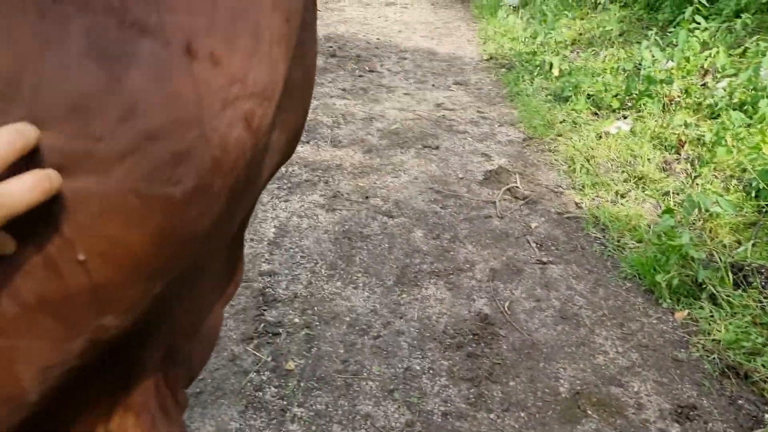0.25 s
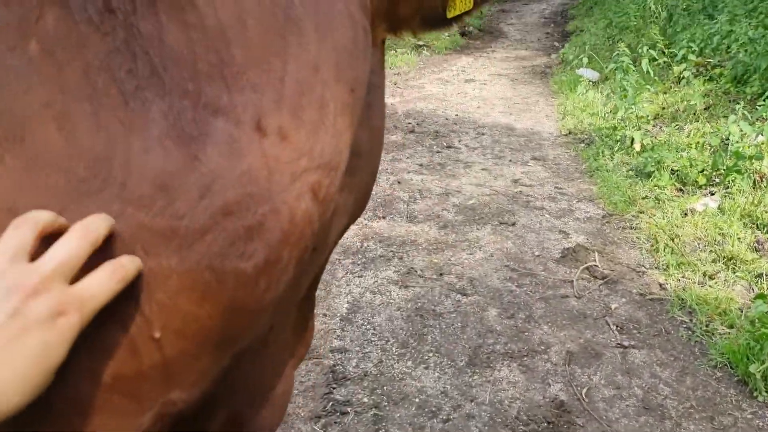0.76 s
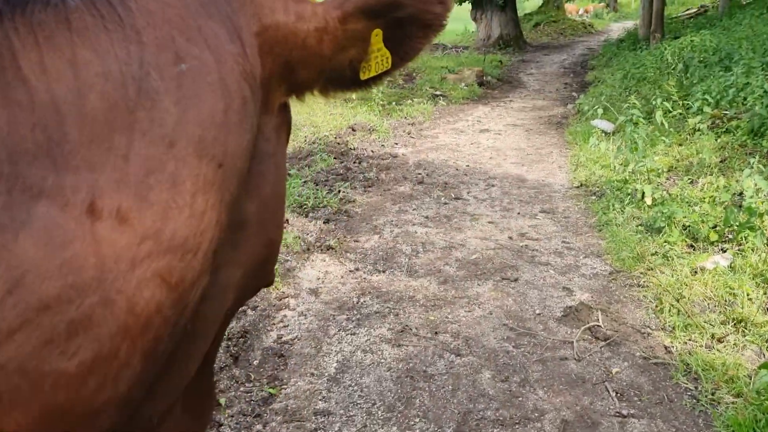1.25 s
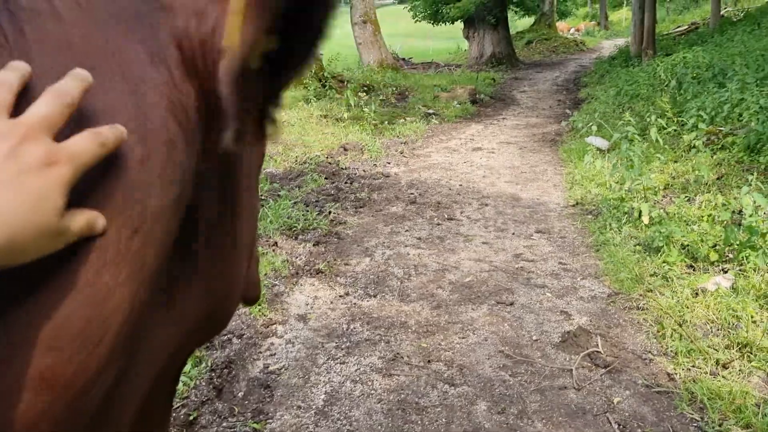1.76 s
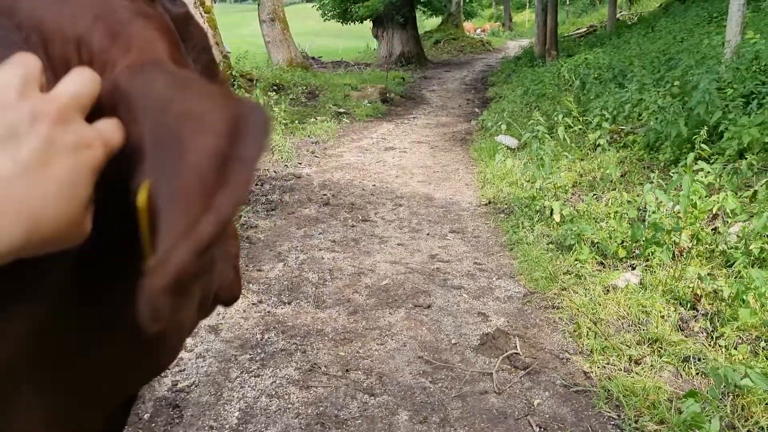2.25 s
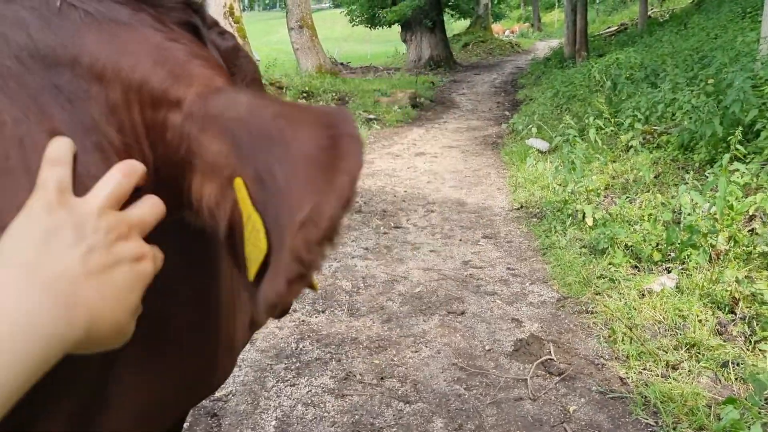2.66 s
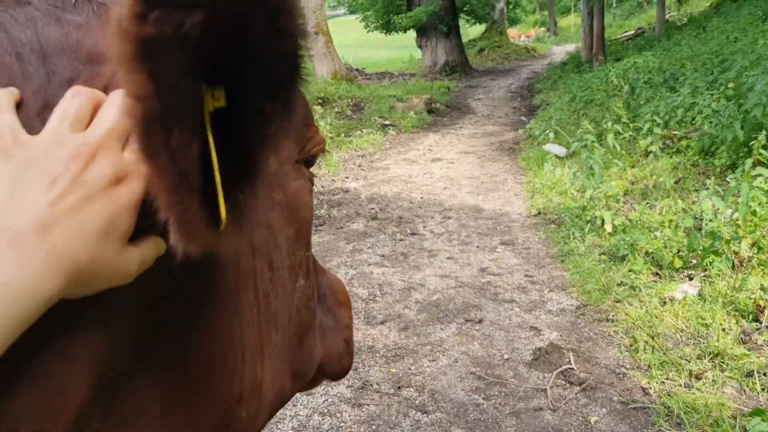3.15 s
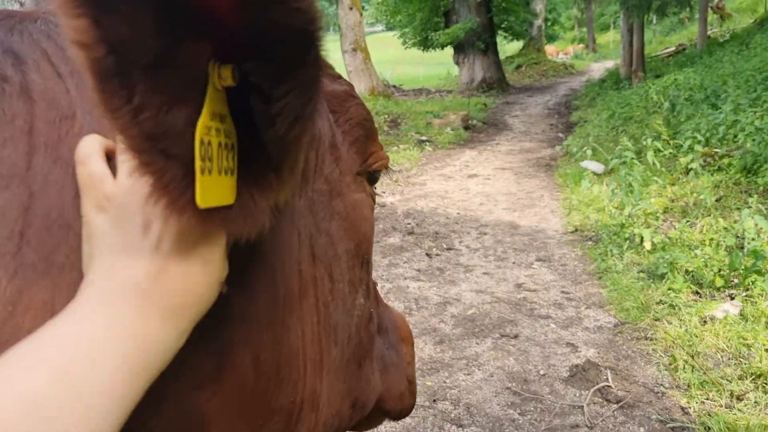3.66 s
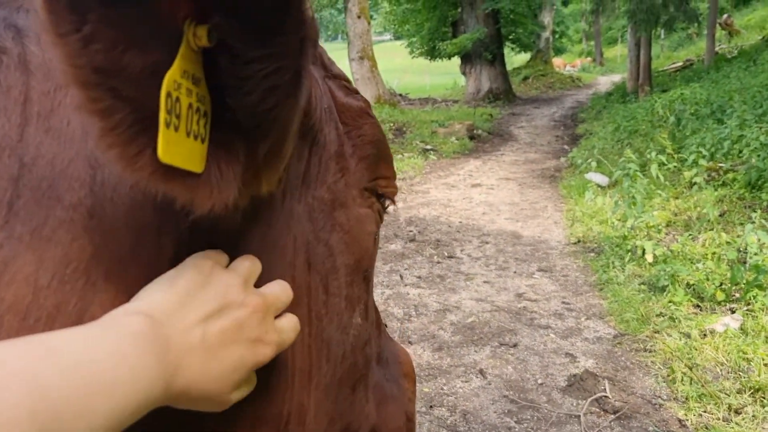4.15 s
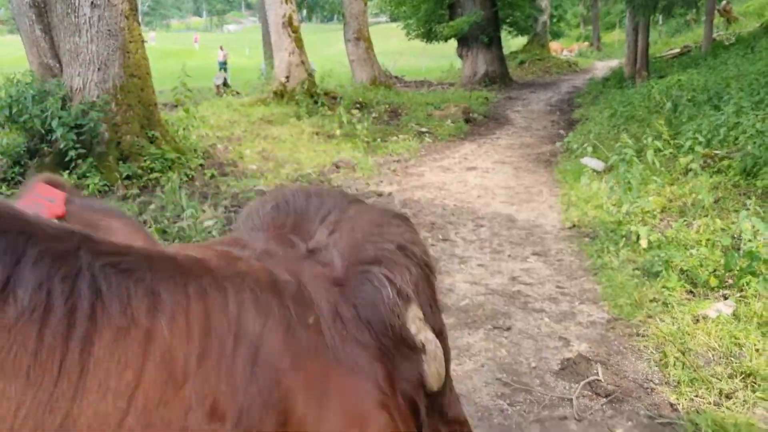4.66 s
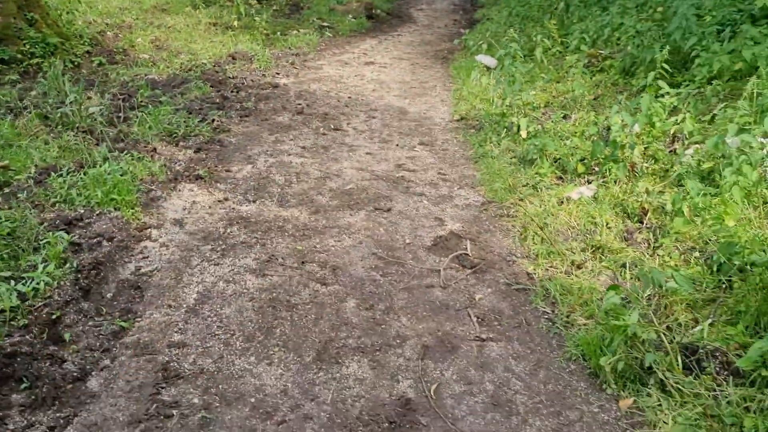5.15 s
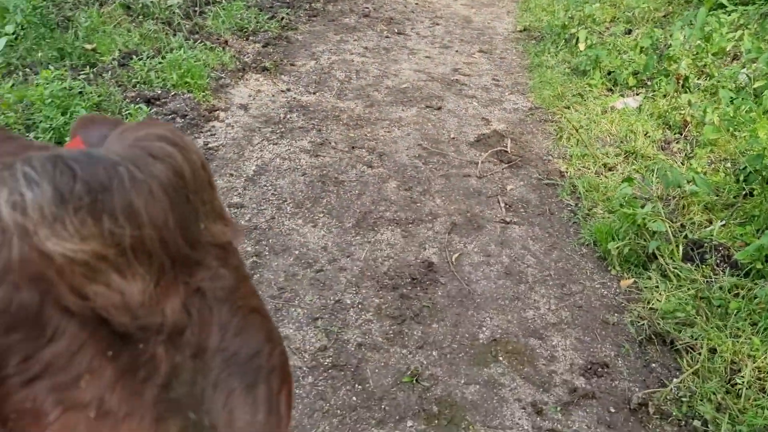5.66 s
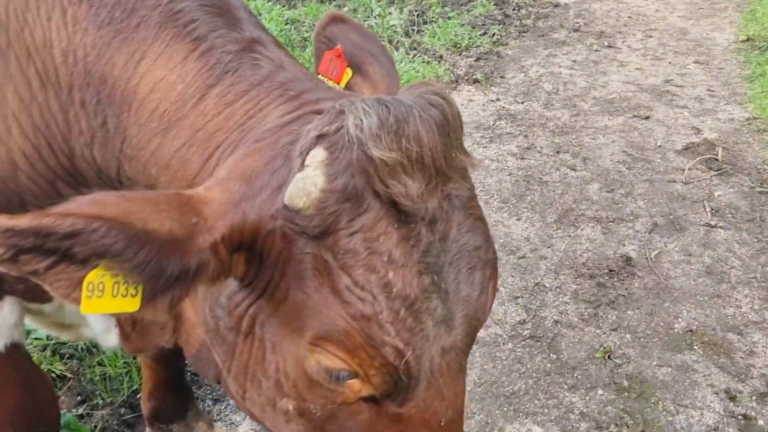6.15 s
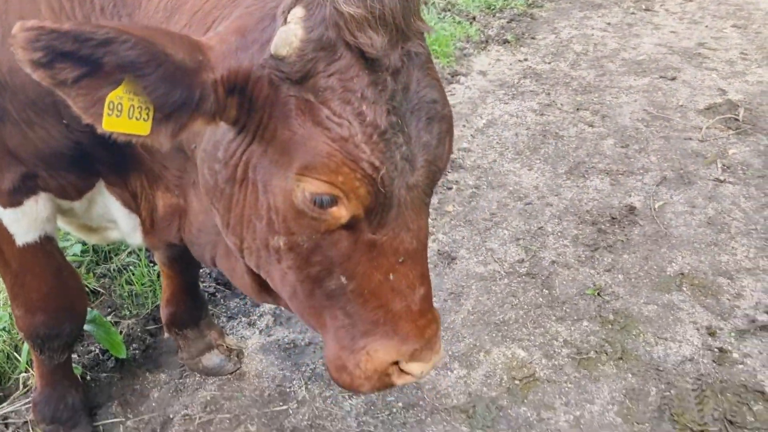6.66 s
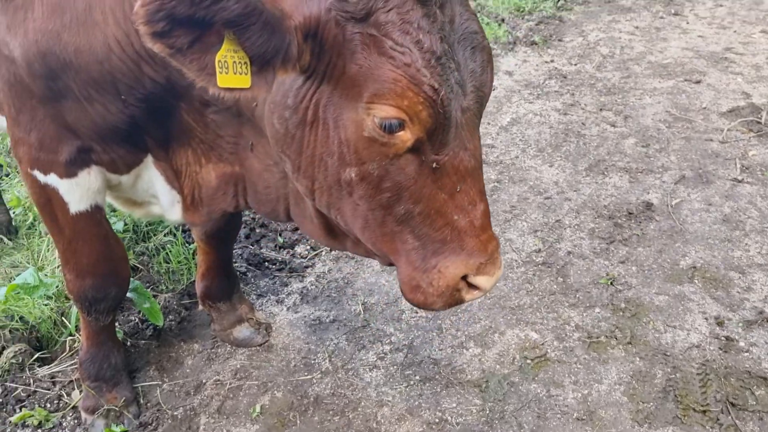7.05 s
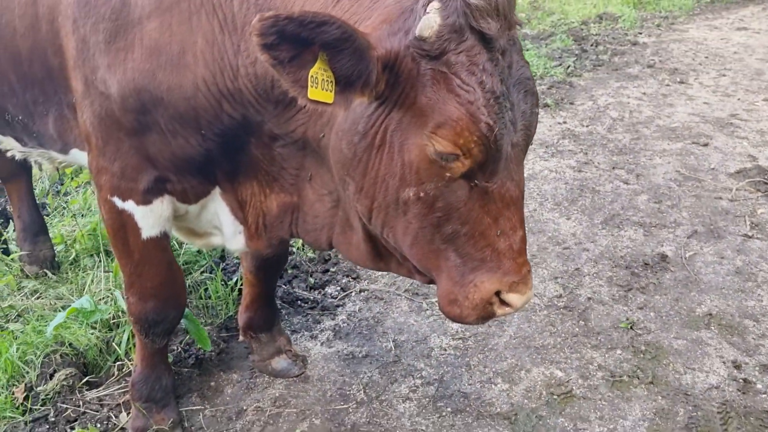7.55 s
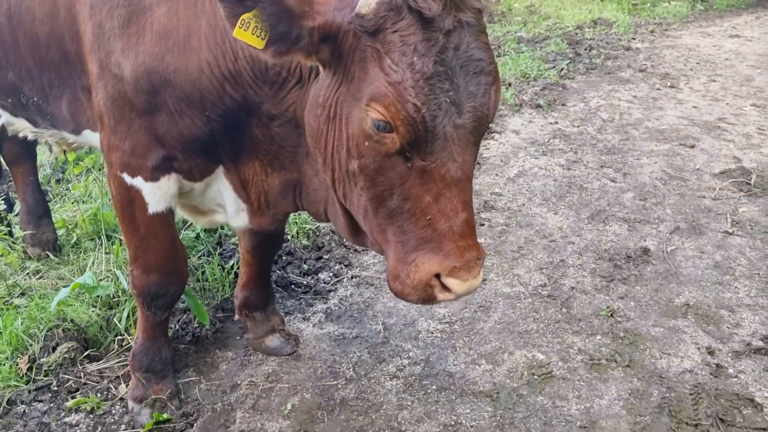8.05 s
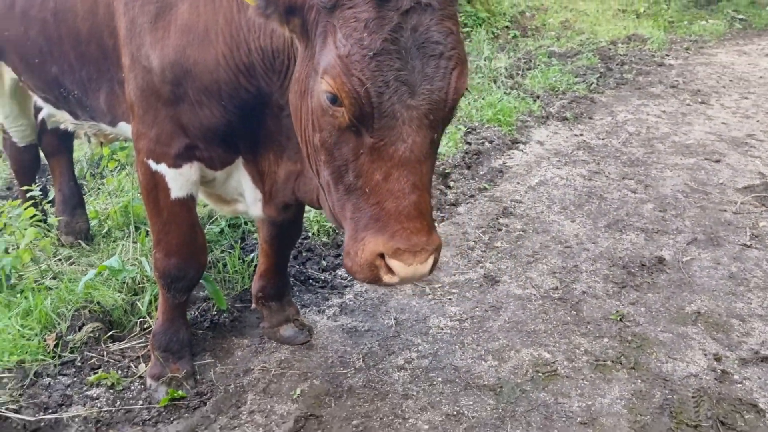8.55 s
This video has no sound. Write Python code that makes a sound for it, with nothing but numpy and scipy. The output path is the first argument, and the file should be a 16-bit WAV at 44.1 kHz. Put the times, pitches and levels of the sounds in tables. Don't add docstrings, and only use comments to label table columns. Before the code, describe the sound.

A cow gives one closed-mouth moo close by, creaky then flipping higher, followed by ear flaps, a hard tag slap and soft breaths among distant birds.

```python
import sys
import numpy as np
from scipy import signal
from scipy.fft import rfft, irfft, next_fast_len
from scipy.io import wavfile
from scipy.ndimage import uniform_filter1d, map_coordinates

SR = 44100
rng = np.random.default_rng(int(sys.argv[2]) if len(sys.argv) > 2 else 0)


def dump_mix(stems):
    frames = np.atleast_2d(stems).T
    limited = np.clip(frames, -1, 1)
    pcm = np.round(limited * 32767).astype(np.int16)
    wavfile.write(sys.argv[1], SR, pcm)


def volts_from_decibels(level):
    exponent = np.asarray(level, float) / 20
    return 10 ** exponent


N = 388080
T = np.arange(N) / SR

# (centre [Hz], width [Hz], level [dB])
CHEST_MODES = [(273.5, 61, -8.5), (546, 61, -10.5), (747, 63, -12), (1060, 120, -13), (1284, 74, -7.5),
               (1900, 160, -11), (2624, 110, -4.5), (3030, 63, -7), (3267, 63, -8), (3790, 91, -9.5)]
# (centre [Hz], width [Hz], level [dB])
HEAD_MODES = [(230, 78, 4), (472, 110, -5), (678, 60, -8), (1108, 124, -3), (1290, 114, -8),
              (1934, 125, -5), (2556, 81, -6.5), (3050, 140, -11.5), (3430, 41, -13.5), (3900, 100, -33.5)]
CREAK_HZ = 93.2
STRAIN_HZ = 251
SKEW_RAD = -1.9


def unit(x):
    return x / np.sqrt(np.mean(x ** 2) + 1e-20)


def along(points, hz):
    f, v = np.transpose(points)
    return np.interp(np.log(hz + 1), np.log(f + 1), v)


def curves(rows, t=T):
    s, *cols = np.transpose(rows)
    return [np.interp(t, s, c) for c in cols]


def above(x, edge, soft):
    return 1 / (1 + np.exp(np.clip((edge - x) / soft, -50, 50)))


def wobble(rate_hz, size=N):
    knots = rng.standard_normal(int(size * rate_hz / SR) + 4)
    return map_coordinates(knots, [np.arange(size) * rate_hz / SR])


def filtered(x, response):
    m = next_fast_len(x.shape[-1] + SR // 4)
    return irfft(rfft(x, m) * response(np.fft.rfftfreq(m, 1 / SR)), m)[..., :x.shape[-1]]


def resonate(modes, f):
    return sum((-1) ** k * volts_from_decibels(db) * 1j * f * w / (c * c - f * f + 1j * f * w)
               for k, (c, w, db) in enumerate(modes))


def place(x, left_db, lead_s):
    side = np.array([[.5], [-.5]])
    return filtered(x * volts_from_decibels(side * left_db), lambda hz: np.exp(2j * np.pi * hz * side * lead_s))


def add(into, x, s):
    part = into[..., round(s * SR):][..., :x.shape[-1]]
    part += x[..., :part.shape[-1]]


def rush(spectrum, patchy_db):
    # (frequency [Hz], left-right likeness [-1..1])
    alike = [(60, 0.61), (150, 1), (380, 0.88), (950, 0.59), (2380, -0.14), (5980, -0.087), (15000, -0.23)]
    z = signal.stft(rng.standard_normal((2, N)), nperseg=512)[2]
    field = uniform_filter1d(rng.standard_normal(z.shape[1:]), 6, 0)
    field = uniform_filter1d(field, 14, 1)
    pair = signal.istft(z * volts_from_decibels(patchy_db * unit(field)), nperseg=512)[1][:, :N]

    def response(hz):
        turn = np.arccos(np.clip(along(alike, hz), -1, 1)) / 2
        return volts_from_decibels(along(spectrum, hz)) * [np.cos(turn), np.sin(turn)]

    mid, side = filtered(pair, response)
    return unit(place(np.array([mid + side, mid - side]), left_db=-1.8, lead_s=0.000444))


def still_air():
    # (frequency [Hz], density [dB per Hz])
    spectrum = [(15, -55), (25, -27), (48, -8), (74, -4.5), (170, -13), (394, -11), (659, -17.5),
                (1290, -21.5), (1700, -44.5), (3920, -29), (10700, -49.5), (12900, -46.5), (16000, -53)]
    # (time [s], level [dB])
    murmur = [(0, -3), (.5, -1.5), (.95, 0.5), (2.9, -0.5), (3.2, -1), (3.6, -2.5), (4, 0), (4.3, 1.5),
              (4.6, -0.5), (5.1, 1), (5.7, -2.5), (6.3, -2), (7, -2.5), (7.9, 0.5), (8.3, -1.5), (8.8, -1)]
    low_hz, high_hz = 130, 900
    air = volts_from_decibels(-53.5 + 0.4 * wobble(2.41)) * rush(spectrum, patchy_db=1.3)
    band = filtered(air, lambda hz: above(hz, low_hz, 30) - above(hz, high_hz, 150))
    return air + (volts_from_decibels(curves(murmur)[0]) - 1) * band


def leaves():
    # (time [s], level [dB])
    rustle = [(0, -65.5), (.21, -63.5), (.45, -65), (1, -58.5), (3, -62.5), (3.76, -65.5), (3.9, -62),
              (4.48, -61), (4.8, -60.5), (6.54, -57), (7.73, -57), (7.88, -55), (8.33, -59.5), (8.8, -58.5)]
    # (frequency [Hz], density [dB per Hz])
    spectrum = [(350, -41.5), (600, -14.5), (638, -9), (1070, 4.5), (1480, 1), (1840, 1.5), (2720, 0.5),
                (7000, -24.5), (9100, -58.5), (15400, -120)]
    level_db, = curves(rustle)
    return volts_from_decibels(level_db + 0.5 * wobble(8.4)) * rush(spectrum, patchy_db=1.8)


def whistle(from_hz, to_hz, length_s, direct, t60_s):
    u = np.arange(0, 1, 1 / (SR * length_s))
    phase = 2 * np.pi * np.cumsum(from_hz + (to_hz - from_hz) * u) / SR
    note = signal.windows.tukey(len(u), .2) * (1 - 0.6 * u) * np.sin(phase)
    paths = rng.standard_normal((2, SR // 2)) * volts_from_decibels(-60 * T[:SR // 2] / t60_s)
    paths /= np.linalg.norm(paths[0])
    paths[:, 0] += direct
    return signal.fftconvolve(note[None], paths, axes=1)


def birds():
    # (time [s], pitch [Hz], level [dB])
    low_notes = [(-.14, 3906, -53.5), (0.124, 3910, -45), (.385, 3926, -45.5), (0.671, 3965, -49.5),
                 (2.11, 4050, -49), (2.374, 3950, -46.5), (2.636, 3906, -49), (2.895, 3912, -47),
                 (3.165, 3866, -47), (3.43, 3863, -49), (3.69, 3860, -45.5), (3.958, 3870, -48),
                 (4.236, 3870, -46.5), (4.509, 3880, -44.5), (7.385, 4016, -56), (7.664, 3975, -49.5),
                 (7.929, 3902, -48.5), (8.2, 3860, -47), (8.455, 3850, -46.5), (8.728, 3820, -46)]
    # (time [s], level [dB])
    high_notes = [(-.01, -64), (.25, -63.5), (.52, -70), (2.5, -66), (2.76, -67), (3.026, -62.5),
                  (3.29, -66), (3.555, -66), (3.82, -66), (4.1, -67), (4.37, -64), (7.785, -71),
                  (8.045, -61), (8.31, -63.5), (8.575, -64)]
    # (time [s], start pitch [Hz], end pitch [Hz], length [s], level [dB])
    chirps = [(.11, 7750, 7580, 0.096, -68), (0.183, 7560, 6700, 0.017, -54),
              (0.352, 8250, 5570, 0.0046, -49.5), (.59, 7760, 7760, 0.015, -56),
              (0.598, 7730, 6600, 0.013, -59), (0.692, 8000, 7160, 0.14, -65.5),
              (1.154, 5950, 5570, 0.14, -66.5), (1.462, 7780, 7630, 0.055, -64),
              (1.497, 7960, 8250, 0.088, -70), (1.524, 7800, 7340, 0.068, -65),
              (2.704, 7790, 7600, .08, -63), (3.39, 7250, 5950, 0.13, -62), (3.551, 6540, 5550, 0.048, -60),
              (3.675, 6900, 5820, 0.035, -62), (4.437, 7670, 7430, 0.099, -67),
              (7.393, 7800, 7630, 0.15, -71), (8.511, 7586, 7580, 0.053, -70)]
    high_hz = 5720
    start, end = 1 + .009, 1 - .009
    out = np.zeros((2, N + SR))
    for s, hz, db in low_notes:
        note = whistle(start * hz, end * hz, length_s=.155, direct=.45, t60_s=.85)
        add(out, volts_from_decibels(db) * note * volts_from_decibels([[-4], [-1]]), s + 1)
    for s, db in high_notes:
        note = whistle(start * high_hz, end * high_hz, length_s=0.068, direct=0.84, t60_s=0.96)
        add(out, volts_from_decibels(db) * note, s + 1)
    for s, from_hz, to_hz, length_s, db in chirps:
        add(out, volts_from_decibels(db - 1.0) * whistle(from_hz, to_hz, length_s, direct=0.62, t60_s=0.81), s + 1)
    return out[:, SR:]


def fading_tone(hz, db, blur_hz):
    def fade():
        return wobble(blur_hz) + 1j * wobble(blur_hz)

    shared, own = fade(), np.array([fade(), fade()])
    tone = volts_from_decibels(db - 1) * np.sqrt(2) * np.exp(2j * np.pi * np.cumsum(hz) / SR)
    return (1 + 0.25 * shared + 0.061 * own) * tone


def engine():
    # (time [s], firing rate [Hz], level [dB])
    firing = [(0.0, 67.46, -66), (0.5, 68.8, -55), (1.1, 67.04, -61.5), (1.9, 63.26, -51),
              (2.6, 60.2, -49.5), (3.0, 55.5, -55), (3.45, 53.8, -53), (3.8, 54.4, -46.5),
              (4.1, 56.3, -54.5), (4.45, 55.5, -51.5), (4.79, 56.56, -47), (5.2, 55.7, -51.5),
              (5.74, 57.3, -48.5), (6.4, 59.76, -54.5), (6.7, 59.87, -49.5), (7.2, 60.36, -54.5),
              (8, 60, -49.5), (8.8, 60.43, -50.5)]
    # (time [s], length [s], level [dB])
    labours = [
        (1.9, .8, -63.5),
        (3.049, 1.54, -58.5),
        (5.2, 1.4, -54.5),
    ]
    # (frequency [Hz], level [dB])
    idler = [(59, -65), (77, -65.5), (118, -71)]
    idle_db = -66.5
    hz, db = curves(firing)
    octave_db = idle_db
    for s, length_s, load_db in labours:
        loaded = above(T, s, 0.07) - above(T, s + length_s, 0.22)
        octave_db = octave_db + (load_db - idle_db) * loaded
    tones = fading_tone(hz, db, blur_hz=4) + fading_tone(2 * hz, octave_db, blur_hz=3)
    for idler_hz, idler_db in idler:
        tones = tones + fading_tone(np.full(N, idler_hz), idler_db, blur_hz=1.5)
    return place(tones.real, left_db=0.9, lead_s=0.00058)


def clicks():
    # (time [s], peak [dB], ring [Hz], left-right [dB])
    taps = [(1.351, -38, 1290, 3.5), (1.438, -40, 999, -11), (1.449, -30, 1950, 1),
            (1.451, -33.5, 3050, -10), (1.957, -48.5, 903, -0.5), (2.328, -38.5, 3300, -10),
            (4.266, -40.5, 5150, -3.5), (4.292, -36.5, 2160, 0.5), (4.321, -40, 2200, -10.5),
            (4.557, -24, 2144, 2.5), (5.0743, -31.5, 3016, -3), (5.079, -33, 1500, -11),
            (5.261, -38.5, 1864, -6.5), (8.162, -47, 1198, -10)]
    # (time [s], peak [dB], ring [Hz], left-right [dB])
    ticks = [(0.952, -34.5, 2018, -2), (1.869, -42, 2250, -12.5), (3.033, -33, 3066, -4),
             (4.943, -34, 815.4, -4), (6.375, -28, 2620, -4), (7.442, -34.5, 1574, -4),
             (7.466, -30, 2567, 5), (8.686, -34, 1060, -2), (8.692, -30, 650, 5), (7.135, -36, 900, 0),
             (8.1, -36.5, 800.6, 0), (1.515, -38.5, 1770, 3)]
    # (time [s], peak [dB], ring [Hz], left-right [dB])
    snaps = [(1.746, -40, 3790, 0), (1.752, -45.5, 3600, -3), (4.266, -47.5, 5200, 0),
             (4.279, -50.5, 6027, 0), (4.313, -44.5, 3600, 0.5), (4.714, -49, 5000, -4),
             (4.745, -47.5, 6050, -4), (4.864, -41.5, 6000, -3.5), (7.655, -53, 6500, -1),
             (8.655, -54, 7000, 0), (4.657, -46, 4500, -0.5), (4.6623, -30, 3170, -1.5),
             (4.821, -43.5, 3050, -22), (5.054, -34, 4220, -3.5), (5.067, -30.5, 3750, 0),
             (5.196, -33.5, 3020, -13)]
    # (clicks, body [dB], edge [dB], rise [s])
    kinds = [(taps, -5, -34, 0.0002), (ticks, -17.5, -43.5, 0.000057), (snaps, -18.5, -9, .00006)]
    out, t = np.zeros((2, N)), np.arange(SR // 12) / SR

    def puff(hz, width_hz, t60_s):
        noise = rng.standard_normal((2, len(t))) * volts_from_decibels(-60 * t / t60_s)
        return filtered(noise, lambda c: resonate([(hz, width_hz, 0)], c) ** 2)

    for rows, body_db, edge_db, rise_s in kinds:
        for s, db, hz, pan_db in rows:
            ring = .5 * np.sin(2 * np.pi * hz * t) * volts_from_decibels(-60 * t / .009)
            body = volts_from_decibels(body_db + 8.5) * puff(350, 2200, t60_s=0.047)
            scatter = 0.067 * puff(0.55 * hz, 4200, t60_s=0.26)
            edge = volts_from_decibels(edge_db) * puff(6000, 11000, t60_s=0.024)
            rise = 1 - np.exp(-t / rise_s)
            pan = volts_from_decibels([[pan_db / 2], [-pan_db / 2]])
            add(out, volts_from_decibels(db) * rise * (ring + body + scatter + edge) * pan, s)
    return out


def overtones(t, hz, head, strain):
    # (time [s], upper mode pitch ratio, upper [dB], lower [dB])
    slide = [(1.15, 1.03, -10, 3.5), (1.19, 1.02, -7, 1), (1.26, 0.98, -3, 3), (1.36, 0.95, 1.5, 2.5),
             (1.42, 0.95, -2, 2.5), (1.55, 0.97, 0, 0.5), (1.65, 1, 2, -2.5), (1.72, 1.01, 2.5, -0.5),
             (1.8, 1.05, 0, 0.5)]
    # (time [s], length [s], half-pitch rise [dB])
    doubling = [
        (2.237, 0.068, 30.5),
        (2.326, 0.034, 37),
        (2.42, 0.03, 38),
        (2.497, 0.091, 24.5),
        (2.633, 0.041, 27.5),
    ]
    order = np.arange(3, 100) / 2
    order = order[order != 2][:, None]
    f = order * hz

    ratio, upper_db, lower_db = curves(slide, t)
    sinus_db = -7 * above(hz, CREAK_HZ, 2)
    chest_shift_db = {4: lower_db, 6: upper_db, 9: sinus_db}
    chest_modes = [(c * (ratio if k == 6 else 1), w, db + chest_shift_db.get(k, 0))
                   for k, (c, w, db) in enumerate(CHEST_MODES)]
    palate_db = -7 * above(-hz, -259.5, 2)
    nose_db = 1 * strain
    head_shift_db = {3: palate_db, 6: nose_db}
    head_modes = [(c, w, db + head_shift_db.get(k, 0)) for k, (c, w, db) in enumerate(HEAD_MODES)]
    throat = (1 - head) * resonate(chest_modes, f) + head * resonate(head_modes, f)
    gain = throat * abs(throat) ** .5

    register = head + strain
    slope_db = np.interp(register, [0, 1, 2], (5, 4.5, -1))
    half_db = np.interp(register, [0, 1, 2], (-41, -45, -37.5))
    for s, length_s, db in doubling:
        half_db = half_db + db * (above(t, s, 0.0029) - above(t, s + length_s, 0.0023))
    gain = gain * volts_from_decibels(-slope_db * np.log2(order / 5.7) * (f < 1550))
    gain = gain * np.where(order % 1, volts_from_decibels(half_db), 1)

    close_s, skew_top_hz = .0006, 460
    gain = gain * np.exp(-2j * np.pi * f * close_s * (f > 350))
    gain = np.where(f < skew_top_hz, abs(gain) * np.exp(1j * SKEW_RAD), gain)
    wander = uniform_filter1d(rng.standard_normal(f.shape), 50, 1)
    wander = unit(uniform_filter1d(wander, 50, 1))
    wander_db = np.interp(head, [0, 1], (0, 2.6))
    return order[:, 0], f, gain * volts_from_decibels(wander_db * (f > skew_top_hz) * wander)


def cow():
    # (time [s], pitch [Hz])
    chest = [(1.04, 61.8), (1.1, 73.56), (1.2, 79.6), (1.302, 87.2), (1.432, 99.7), (1.512, 111.1),
             (1.692, 132.2), (1.785, 134.2), (1.815, 146.1)]
    # (time [s], pitch [Hz])
    head_pitch = [(1.837, 226), (1.87, 228), (1.97, 229), (2.005, 235), (2.115, 236.5), (2.166, 243),
                  (2.194, 254),
                  (2.247, 266.1), (2.331, 271.5), (2.37, 281), (2.409, 278.1), (2.439, 269), (2.55, 267.4),
                 (2.578, 256.8), (2.62, 257.6), (2.65, 254.7)]
    # (time [s], pitch [Hz])
    fall = [(2.685, 251), (2.756, 230.8), (2.799, 204.4), (2.83, 162), (2.854, 173.3), (2.874, 91.5),
            (2.94, 62)]
    # (time [s], effort [dB], nostril opening [dB])
    effort = [(1.04, -46, -75), (1.1, -49.5, -61.5), (1.2, -40.5, -47), (1.3, -38, -47), (1.47, -29.5, -46),
              (1.8, -23.5, -43.5), (2.8, -24, -43), (2.855, -25.5, -49.5), (2.94, -47, -92)]
    # (frequency [Hz], level [dB])
    hum = [(60, -5), (90, -9), (130, -4.5), (200, -0.5), (240, -1), (280, -6), (480, -4.5), (560, -11)]
    t = np.arange(chest[0][0], fall[-1][0], 1 / SR)
    hz, = curves(chest + head_pitch + fall, t)
    effort_db, mid_db = curves(effort, t)
    flip_s = 1.826
    head, strain = above(t, flip_s, 0.013), above(hz, STRAIN_HZ, 2.5)
    unsteady = above(t, 1.55, .05) - above(t, 1.99, .01)

    first_db = effort_db + along(hum, hz) + 0.8 * strain * wobble(70, size=len(t))
    thin = above(hz, 138.1, 4.5)
    second_db = effort_db + along(hum, 2 * hz) + np.interp(thin, [0, 1], (-3.5, -17.5))

    mid_db = mid_db - 1.5 * np.exp(-((hz - STRAIN_HZ) / 5.9) ** 2)
    mid_db = mid_db - 1.5 * strain - 3 * head * unsteady
    top_db = mid_db + np.interp(head, [0, 1], (-14.5, -6))
    top_db = top_db + 11 * (1 - head) * above(-hz, -CREAK_HZ, 1.5)
    flare_db = 2.5 * np.exp(-((t - 2.75) / 0.018) ** 2)
    mid_db = mid_db + flare_db

    clear, hoarse = .07, .3
    share = clear + (hoarse - clear) * (strain + unsteady).clip(0, 1)
    jitter = .025 * share * wobble(45, size=len(t))
    phase = 2 * np.pi * np.cumsum(hz * (1 + jitter)) / SR

    def lag(k):
        chest_ring = resonate([(188, 90, 0)], k * hz)
        return (1 - head) * SKEW_RAD + head * np.angle(chest_ring)

    voice = volts_from_decibels(first_db) * np.cos(phase + lag(1)) + volts_from_decibels(second_db) * np.cos(2 * phase + lag(2))
    voice = np.sqrt(2) * voice

    step = slice(None, None, 32)
    slow_t, slow_head = t[step], head[step]
    order, f, gain = overtones(slow_t, hz[step], slow_head, strain[step])
    puffs = rng.standard_normal(len(t)) * np.exp((1.6 - head) * np.cos(phase - 1.2))
    for low, high, level_db, noisy in [(0, 1550, mid_db, share / 4), (1550, 4300, top_db, share)]:
        g = gain * (f >= low) * (f < high)
        power = np.sum(abs(g * (f > 350)) ** 2, 0) / 2
        g = g / np.sqrt(sum(w * np.average(power, weights=w) for w in (1 - slow_head, slow_head)))
        lines = np.zeros(len(t))
        for k, row in zip(order, g):
            if row.any():
                lines += (np.interp(t, slow_t, row) * np.exp(1j * k * phase)).real
        chest_air, head_air = [
            unit(filtered(puffs, lambda c: abs(resonate(modes[1:], c)) ** 2.0 * (c >= low) * (c < high)))
            for modes in (CHEST_MODES, HEAD_MODES)]
        air = (1 - head) * chest_air + head * head_air
        voice += volts_from_decibels(level_db) * (np.sqrt(1 - noisy) * lines + np.sqrt(noisy) * air)
    out = np.zeros(N)
    add(out, voice * signal.windows.tukey(len(t), .03), t[0])
    return place(out, left_db=1, lead_s=.0003)


def coat():
    # (time [s], held [s], level [dB])
    strokes = [(1.35, 1, -75.5), (2.429, 0.0071, -64), (2.739, 0.016, -61.5), (2.91, 0.0073, -72.5),
               (3.14, 0.0067, -68.5), (3.48, 0.011, -66.5), (4.31, 0.011, -62), (4.56, 0.12, -65),
               (4.72, 0.12, -57.5), (4.95, 0.33, -64), (5.36, 0.64, -75.5), (6.37, 0.011, -73.5)]
    # (time [s], held [s], level [dB])
    swipes = [
        (5.195, 0.0057, -53),
        (5.75, 0.005, -70.5),
    ]
    # (frequency [Hz], density [dB per Hz])
    spectrum = [(1760, -27.5), (3000, -4.5), (5600, -14), (6710, -12), (11100, -20), (12900, -15),
                (16000, -23)]
    fade_db_per_s = 138.5
    gain = volts_from_decibels(-77)
    for rows, rise_db_per_s in [(strokes, 238), (swipes, 2995)]:
        for s, held_s, db in rows:
            rise_db = rise_db_per_s * (s - T).clip(0)
            fade_db = fade_db_per_s * (T - s - held_s).clip(0)
            gain = gain + volts_from_decibels(db - rise_db - fade_db)
    return gain * volts_from_decibels(1.5 * wobble(30) + 2 * wobble(250)) * rush(spectrum, patchy_db=1.5)


def snuffles():
    # (time [s], length [s], start [Hz], end [Hz], level [dB])
    sniffs = [
        (1.494, 1.43, 7460, 7420, -76),
        (1.597, 1.08, 8920, 9560, -74.5),
        (3.918, 0.26, 2295, 2265, -63.5),
        (5.358, 0.73, 2745, 2550, -61.5),
        (5.996, .18, 2235, 2330, -60.5),
        (6.254, 0.8, 1900, 1900, -63.5),
        (7.748, 0.31, 2277, 2260, -57.5),
    ]
    # (time [s], length [s], start [Hz], end [Hz], level [dB])
    snorts = [
        (5.253, 0.024, 1783, 1846, -47),
        (5.255, 0.038, 2200, 2900, -45.5),
        (5.233, 0.031, 1252, 1700, -49),
        (5.18, 0.065, 2200, 2900, -52),
        (5.704, 0.46, 1366, 1040, -59),
        (6.552, .25, 2675, 2300, -59.5),
        (7.0, 0.66, 3750, 3800, -62.5),
    ]
    out = np.zeros((2, N))
    for rows, width in [(sniffs, 0.1), (snorts, 0.22)]:
        for s, length_s, from_hz, to_hz, db in rows:
            u = np.arange(0, 1, 1 / (SR * length_s))
            air = rng.standard_normal((2, 2, len(u)))
            slow = filtered(air, lambda c: 1 / (1 + (2 * c / (width * from_hz)) ** 2))
            turn = 2 * np.pi * np.cumsum(from_hz + (to_hz - from_hz) * u) / SR
            hiss = unit(slow[0] * np.cos(turn) + slow[1] * np.sin(turn))
            add(out, volts_from_decibels(db) * np.sin(np.pi * u) ** 0.34 * hiss, s)
    return out


def thumps():
    # (time [s], peak [dB], pitch [Hz], t60 [s])
    blows = [
        (4.548, -32, 214, 0.08),
        (4.586, -35, 200, 0.1),
        (4.621, -34.5, 188, 0.074),
        (4.557, -33.5, 548, 0.035),
        (5.094, -34, 500, .01),
        (5.105, -25, 340, 0.034),
        (5.1113, -17, 312, .012),
        (6.817, -39.5, 178.5, 0.062),
        (6.872, -29.5, 136.8, 0.02),
        (8.685, -42, 430, 0.025),
    ]
    out, t = np.zeros((2, N)), np.arange(SR // 12) / SR
    for s, db, hz, t60_s in blows:
        rise = 1 - np.exp(-t / 0.00061)
        add(out, volts_from_decibels(db - 60 * t / t60_s) * rise * 0.99 * np.sin(2 * np.pi * hz * t), s)
    return out


def slap():
    # (time [s], level [dB])
    contacts = [(5.094, -36), (5.0975, -32), (5.0998, -21), (5.1006, -16), (5.1012, -17), (5.102, -21),
                (5.1035, -13), (5.104, 0), (5.1046, -11), (5.1053, -13), (5.106, -13), (5.1068, -18),
                (5.1078, -19), (5.1094, -19), (5.1105, -24), (5.1135, -27), (5.1178, -25), (5.1205, -28),
                (5.125, -32)]
    # (centre [Hz], width [Hz], level [dB])
    tag_modes = [(90, 210, -5.5), (446, 260, -2), (1330, 330, 11.5), (3300, 1060, 1.5), (4620, 2200, -2.5),
                 (8760, 8400, -10)]
    # (frequency [Hz], left-right [dB])
    tag_side = [(60, 2), (300, 8), (700, 10.5), (1410, 1), (3100, -5.5), (4500, -21), (8000, 5), (15000, 2)]
    blows, t = np.zeros(N), np.arange(SR // 10) / SR
    for s, db in contacts:
        grit = .07 * volts_from_decibels(-60 * t / .004) * rng.standard_normal(len(t))
        blow = volts_from_decibels(db + 10) * ((t == 0) + grit)
        corner_hz = 16000 * volts_from_decibels(db / 2)
        add(blows, filtered(blow, lambda hz: 1 / (1 + 1j * hz / corner_hz)), s)
    rattle = volts_from_decibels(-10.5 - 60 * t / 0.064) * rng.standard_normal(len(t))
    add(blows, filtered(rattle, lambda hz: resonate([(3030, 1400, 0)], hz)), contacts[6][0])
    half = np.array([[.5], [-.5]])
    ports = place(blows, left_db=0, lead_s=.00027)
    return filtered(ports, lambda hz: resonate(tag_modes, hz) * volts_from_decibels(half * along(tag_side, hz)))


def scene():
    wood = still_air() + leaves() + birds() + engine()
    return wood + clicks() + cow() + coat() + snuffles() + thumps() + slap()


def top_cut(x):
    return signal.sosfilt(signal.butter(12, 16490, fs=SR, output="sos"), x)


def record(dry):
    top_hz = 16450
    mix = filtered(dry.clip(-.94, .94), lambda hz: hz < top_hz)
    return top_cut(mix)


dry = scene()
out = record(dry)
dump_mix(out)
```